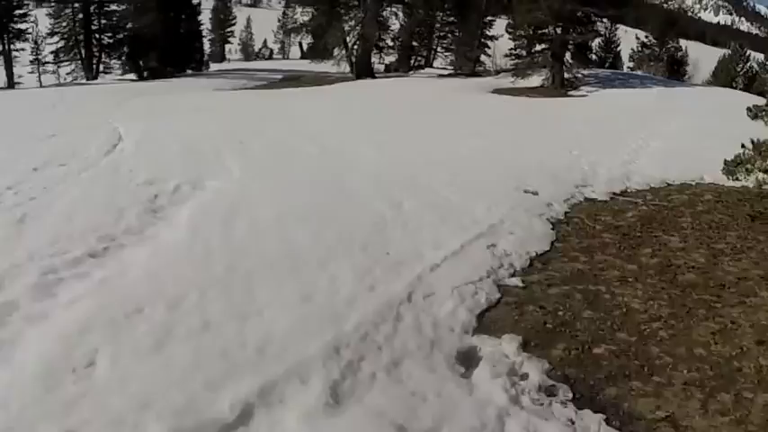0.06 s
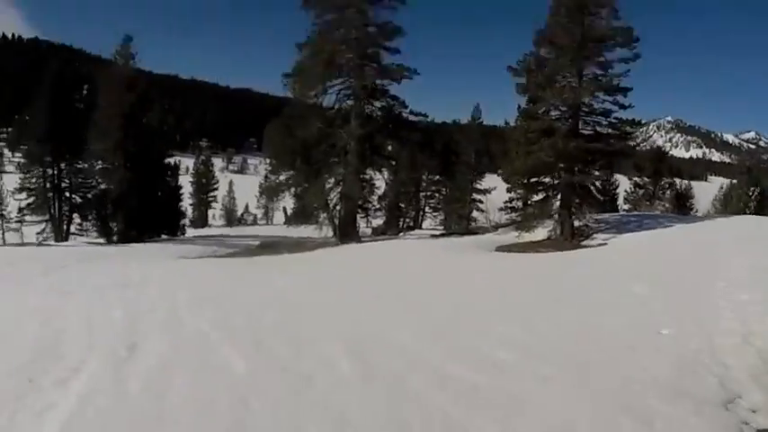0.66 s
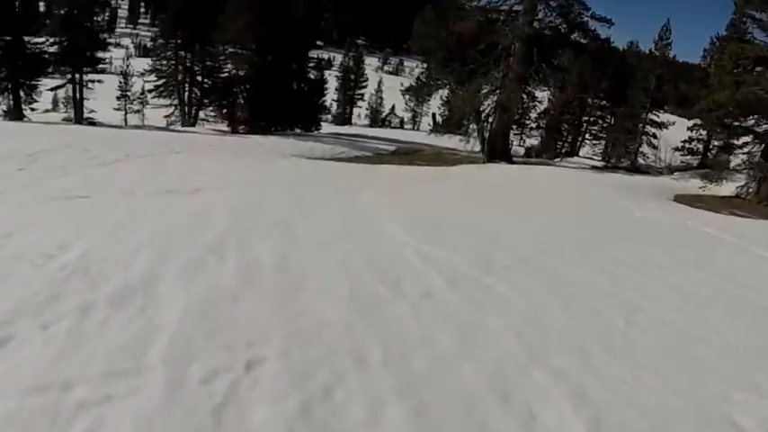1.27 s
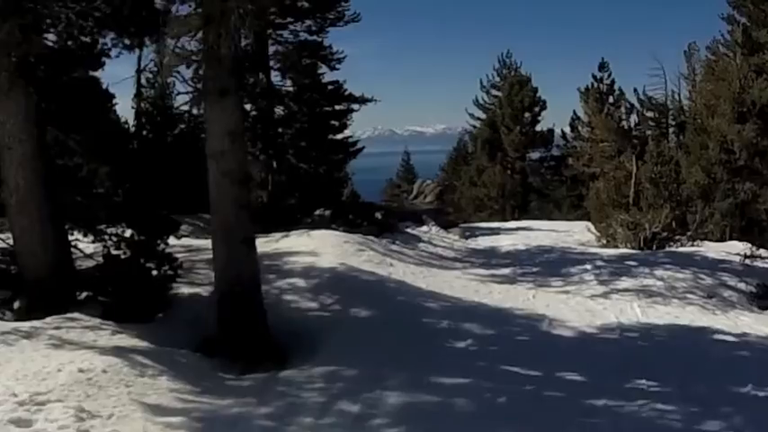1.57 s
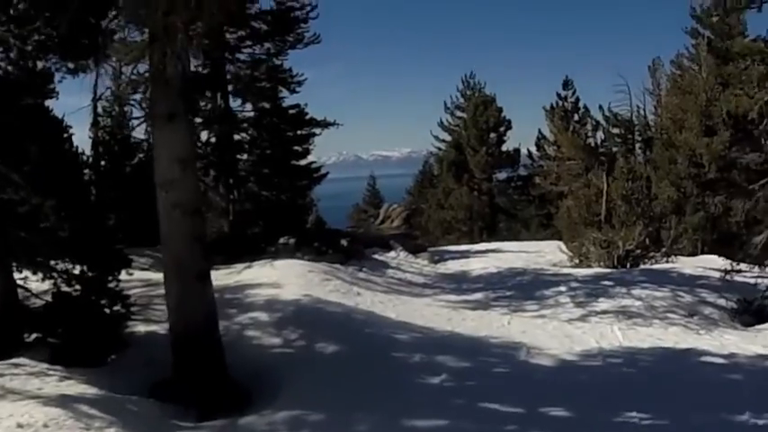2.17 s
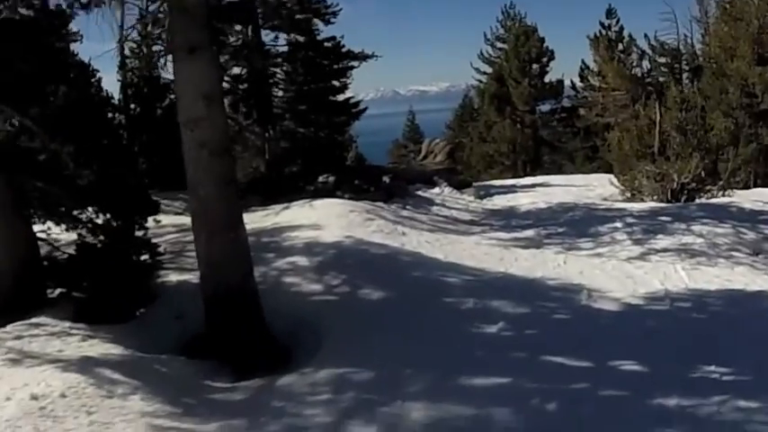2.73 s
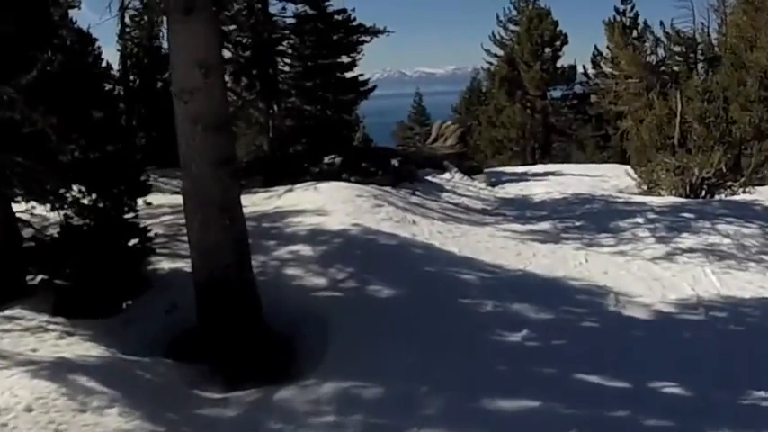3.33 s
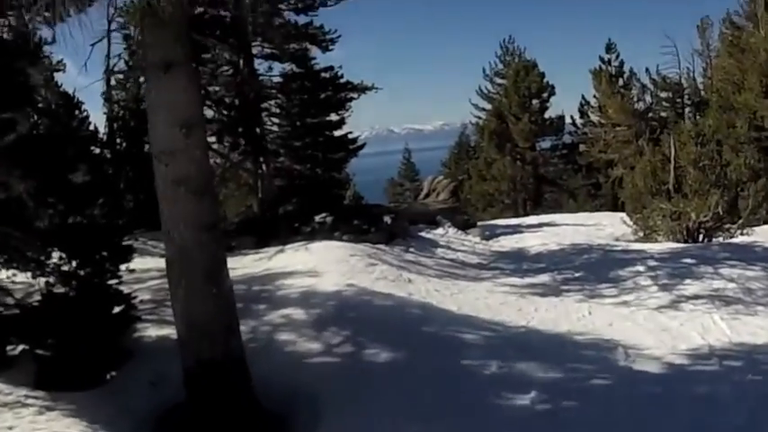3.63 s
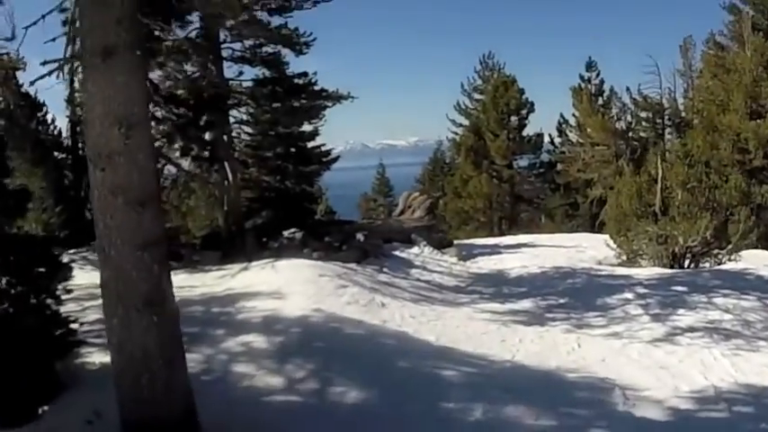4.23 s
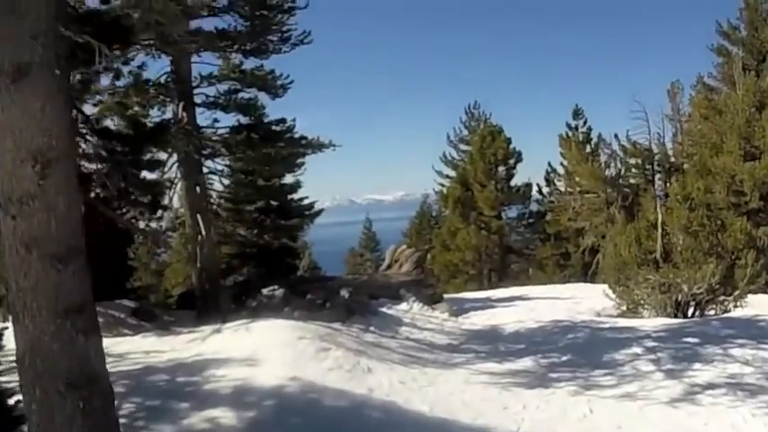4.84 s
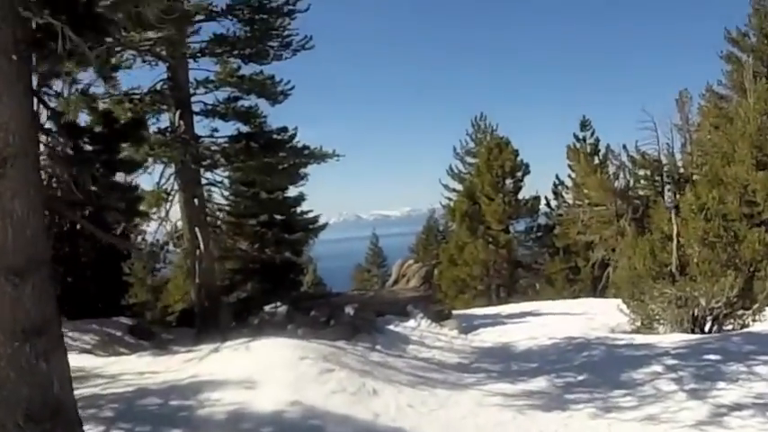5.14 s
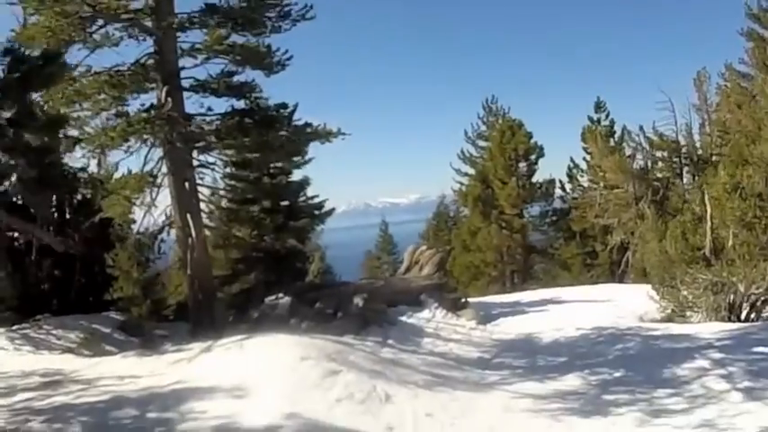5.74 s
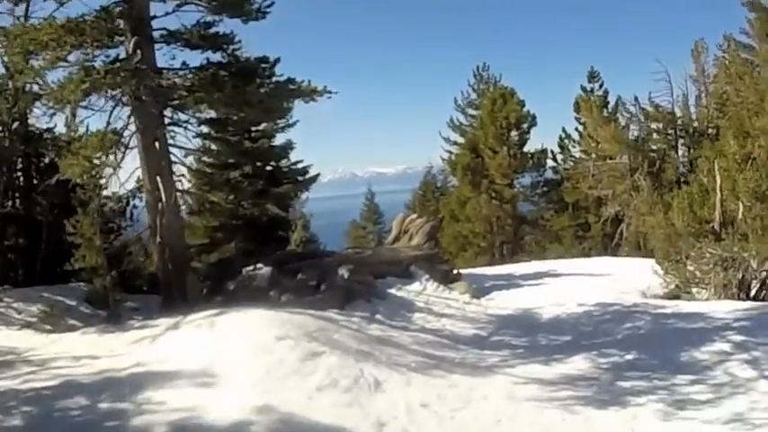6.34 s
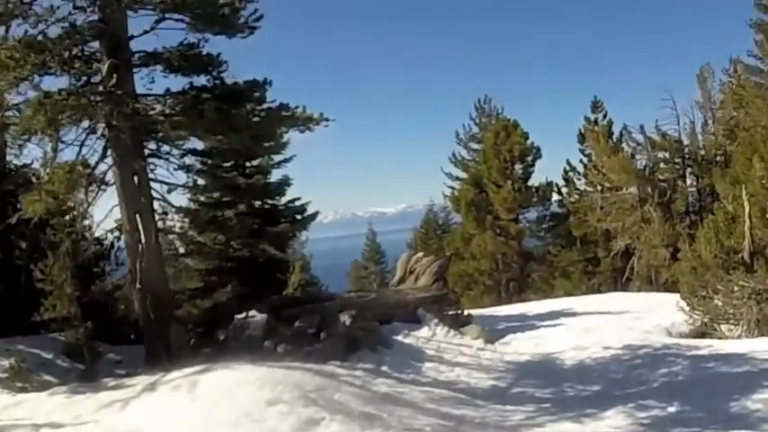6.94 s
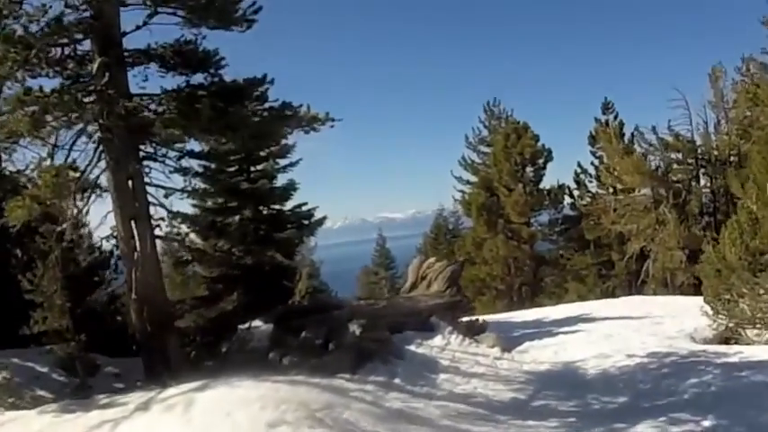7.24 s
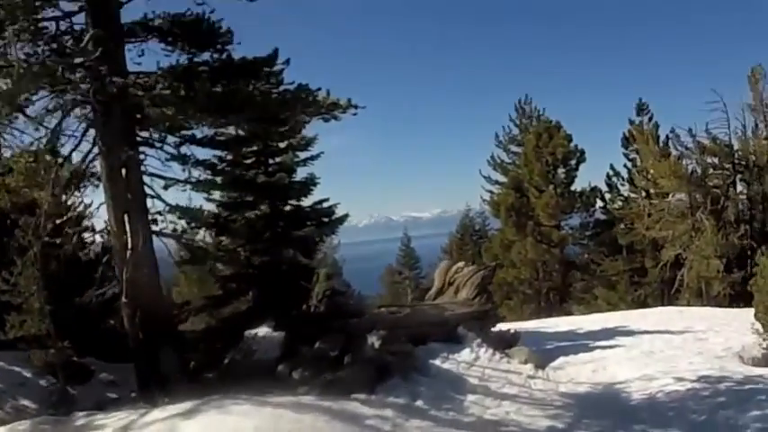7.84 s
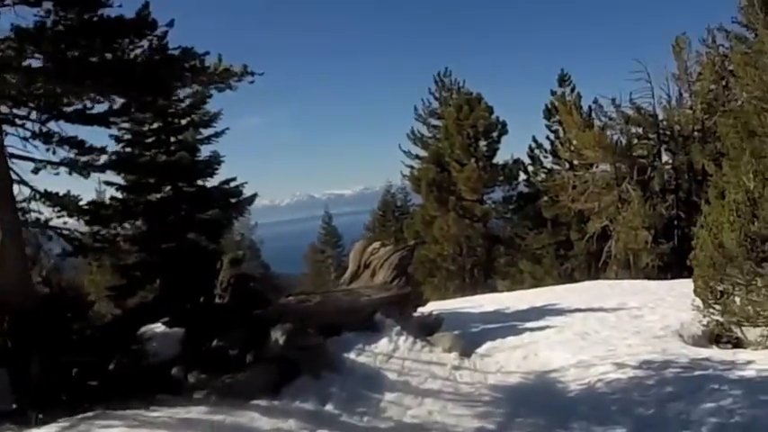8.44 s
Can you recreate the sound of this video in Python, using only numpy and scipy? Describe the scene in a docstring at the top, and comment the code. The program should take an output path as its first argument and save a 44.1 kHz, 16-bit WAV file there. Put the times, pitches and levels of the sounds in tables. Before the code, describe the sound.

Bike tyres crunch over firm snow while loose parts rattle and wind buffets the microphone, fast at first, then slower.

```python
"""On firm spring snow, a camera rides along with a bike: first fast, then, after a brief dip, slower.
The crust crunches under the tyres, grinds in skids and snaps in plates; ice grains hiss and tinkle.
Loose parts tick over the bumps, the frame clacks and something squeaks once.
Wind eddies buffet the microphone. The camera's case makes everything boxy."""
import sys
import numpy as np
from scipy import signal
from scipy.fft import rfft, irfft, next_fast_len
from scipy.io import wavfile
from scipy.ndimage import uniform_filter1d, map_coordinates

SR = 44100
rng = np.random.default_rng(int(sys.argv[2]) if len(sys.argv) > 2 else 0)


def file_out(sig):
    """Save sig as 16-bit WAV at sys.argv[1]."""
    # one column per channel
    cols = np.atleast_2d(sig).T
    # limit, then scale
    lim = np.clip(cols, -1, 1)
    pcm = np.round(lim * 32767).astype(np.int16)
    wavfile.write(sys.argv[1], SR, pcm)


N = 374850
TIME = np.arange(N) / SR

# Steady rolling: (time [s], crunch [dB], hiss [dB])
ROLLING_LEVELS = [(0, -24.5, -44.5), (.5, -25.5, -48.5), (1.45, -24.5, -48), (1.57, -30.5, -51.5),
                  (1.7, -43.5, -61.5), (2.1, -38.5, -59.5), (3.35, -38, -58.5), (4.15, -36, -55),
                  (4.45, -31.5, -54.5), (5.7, -30, -52.5), (6.3, -34.5, -57), (6.75, -31.5, -54),
                  (7.35, -34, -58), (7.75, -33, -54.5), (8.5, -32.5, -56)]
# Bumps (+) and hollows (-): (time [s], half length [s], crunch [dB], hiss [dB])
BUMP_LOADS = [(.15, 0.03, 6, 0.5), (.225, .02, -2, 1), (.266, 0.023, 6.5, -1), (2.43, .05, -7.5, -2.5),
              (2.58, .07, 2.5, 1), (2.795, 0.067, 6, 6), (2.97, .04, 0.5, -2), (3.15, 0.035, 10, 4),
              (3.59, 0.13, 4, 2), (3.715, 0.04, 6.5, 5), (3.95, .035, 2.5, 2), (4.15, 0.027, 0, 2),
              (4.33, .04, 4, 1), (4.57, .03, 1.5, 1), (4.65, .025, 1.5, 5), (4.765, 0.07, -12, -5.5),
              (4.855, .025, 0, -2.5), (4.93, .05, 2, 2.5), (5.15, .09, -6.5, -1.5), (5.38, 0.06, -7.5, -2),
              (5.47, 0.026, 5, -2), (5.6, .03, 2, 2), (5.7, 0.044, -2, 0), (5.93, .03, 5.5, 1.5),
              (6.5, .03, -2.5, -1.5), (6.58, .03, 1.5, 1.5), (7.25, 0.031, 2.5, 0), (7.42, .06, -5, -2.5),
              (7.63, .04, 2, 0), (7.74, 0.035, 4, 0.5), (7.85, 0.049, 2.5, 0), (7.96, .04, -3, 1.5),
              (8.28, .02, 2.5, -1), (8.42, 0.064, 1.5, 0)]
def contact_db():
    """Crunch and hiss levels of the tyres: steady rolling plus the load over each bump."""
    return np.array(curves(ROLLING_LEVELS)) + swells(BUMP_LOADS)


# Breaking crust: (frequency [Hz], gain [dB])
CRUNCH_SPECTRUM = [(40, -33), (160, -9.5), (300, -4.5), (500, 0), (750, 1), (1130, 2), (1300, -6.5),
                   (1600, -15.5), (2050, -22.5), (2550, -35.5), (3100, -27), (4500, -64), (8500, -55),
                   (11000, -74)]
# Ice grains: (frequency [Hz], gain [dB])
HISS_SPECTRUM = [(800, -5.5), (2000, 11.5), (2600, 4.5), (3100, 5), (4000, 0.5), (4700, -4), (5900, -0.5),
                 (7000, -6), (8400, -12), (9400, -19.5), (10300, -18), (11200, -23), (12400, -19.5),
                 (14200, -34), (15400, -47)]
def tyres(clump_db=0.92, tilt_db=3, mush_db=-5, grit_db=-2, crust_db=2, ice_db=3.5, ripple_db=1.5):
    """The crust breaks in clumps under the tread: dull cracks and a fine hiss of ice grains."""
    crunch_db, hiss_db = contact_db() + ripple_db * wobble(rate_hz=14)  # ripples in the snow
    clumps_db = clump_db * wobble(rate_hz=60)
    pace = amp(.6 * (crunch_db - np.mean(crunch_db)))  # faster riding breaks more crust
    crunch = np.zeros(N)
    for slope_db in (-tilt_db, tilt_db):  # a duller and a brighter layer of cracks
        cracks = grains(per_s=450 * pace, spread_db=2) / np.sqrt(pace)
        crust = unit(cracks) + amp(mush_db) * rng.standard_normal(N)
        spectrum = [(hz, db + slope_db * np.clip(np.log2(hz / 750), -1, 1))
                    for hz, db in CRUNCH_SPECTRUM]
        crunch += coloured(crust * amp(clumps_db), spectrum)
    ice = rng.standard_normal(N) + amp(grit_db) * crackle(per_s=130 * pace, decay_s=0.0017)
    hiss = unit(coloured(ice * amp(1.54 * clumps_db), HISS_SPECTRUM))
    return amp(crunch_db + crust_db) * levelled(crunch, samples=5000) + amp(hiss_db + ice_db) * hiss


def grains(per_s, spread_db):
    """Tiny fractures of uneven size at random moments; rms 1."""
    fractures = rng.random(N) < per_s / SR
    sign = rng.choice([-1, 1], N)
    size_db = spread_db * np.clip(rng.standard_normal(N), -2, 2)
    return unit(fractures * sign * amp(size_db))


def crackle(per_s, decay_s):
    """Ice grains scatter in tiny sprays that start at once and die away."""
    t = np.arange(SR // 25) / SR
    power = signal.fftconvolve(grains(per_s, spread_db=-1.5) ** 2, np.exp(-t / decay_s))[:N]
    return unit(np.sqrt(np.abs(power)) * rng.standard_normal(N))


# Tread slips: (time [s], length [s], level [dB])
SKID_EVENTS = [(0.853, 0.32, -40), (1.724, 0.33, -54.5), (2.218, 0.07, -47), (2.52, 0.15, -47.5),
               (2.74, 0.02, -47), (2.807, 0.012, -32.5), (3.115, 0.068, -40), (3.192, 0.13, -46),
               (3.438, 0.18, -46), (3.66, .03, -42), (3.692, 0.056, -35.5), (3.85, 0.14, -51),
               (4.128, 0.04, -41), (4.312, 0.041, -46), (4.56, 0.05, -42), (4.833, 0.015, -37.5),
               (4.897, 0.043, -43), (5.448, .04, -56), (6.557, 0.04, -41), (6.886, 0.035, -39.5),
               (7.03, 0.13, -49), (7.25, 0.029, -41), (7.59, 0.034, -46), (7.72, 0.34, -52)]
# Grinding crust: (frequency [Hz], gain [dB])
SKID_SPECTRUM = [(400, -12), (800, 5), (1150, 6), (1500, 2), (1950, 6.5), (2550, -12), (2950, 0.5),
                 (3300, -13.5), (3550, -7), (4500, -18), (8000, -22.5), (9500, -38), (13000, -40),
                 (15500, -37)]
def skids(attack_s=0.0057, mush_db=-9):
    """The tread bites into icy crust and eases off: a gritty run of tiny fractures."""
    power = np.zeros(N)
    for time_s, length_s, db in SKID_EVENTS:
        age_s = np.maximum(TIME - time_s, 0)
        bite = 1 - np.exp(-age_s / attack_s)
        release = np.exp(-.5 * (age_s / length_s) ** 2)
        power += (amp(db) * bite * release) ** 2
    grit = grains(per_s=450, spread_db=3) + amp(mush_db) * rng.standard_normal(N)
    return np.sqrt(power) * levelled(coloured(grit, SKID_SPECTRUM), samples=2000)


# Crust plates giving way: (time [s], level [dB])
PLATE_SNAPS = [(0.275, -5), (0.29, -16), (4.989, -14), (5.189, -14), (5.27, -20), (6.396, -15.5),
               (6.525, -17.5), (7.045, -11), (7.107, -20), (7.318, -23), (8.189, -21), (8.284, -11)]
def plates(gain_db=-2):
    """A larger piece of crust snaps: one impulse, as boxy as the crunch."""
    snap = coloured(signal.unit_impulse(SR // 20), CRUNCH_SPECTRUM)
    snap /= np.abs(snap).max()
    out = np.zeros(N + SR)
    for time_s, db in PLATE_SNAPS:
        out[round(time_s * SR):][:len(snap)] += amp(db + gain_db) * snap
    return out[:N]


# Loud rattles: (time [s], click [dB], knock [dB], length [s], ring [Hz], ring [dB])
LOUD_TAPS = [(.1005, -30, -19.5, 0.0015, 8700, 9), (.1465, -32, -27.5, 0.0026, 2570, 7.5),
             (.157, -31, -33, 0.0038, 7250, 7), (.2595, -33, -26, 0.0032, 7900, 6),
             (.343, -27.5, -25, 0.00078, 6700, 9), (.419, -37, -34, 0.002, 3100, 6),
             (.454, -30, -32, 0.0032, 7700, -12), (.549, -37, -31, 0.0046, 8100, -1),
             (.5905, -30, -26, 0.0021, 7740, 1), (.597, -34, -26, 0.002, 2220, 11),
             (.6025, -36, -28, 0.0052, 4600, 4), (.637, -39, -30, 0.0053, 8270, 4),
             (.6753, -34.5, -50, 0.003, 2920, 13), (.734, -29.5, -25.5, 0.0036, 4800, 1),
             (.7415, -29, -29, 0.0018, 4800, 5), (.868, -39, -43, 0.0099, 8100, 0),
             (1.102, -30, -25.5, 0.0011, 4540, 4), (1.383, -35, -44, 0.0031, 2500, 5.5),
             (2.1482, -51.5, -46, 0.0012, 5050, 21), (2.8225, -42, -44, 0.0036, 7800, 6),
             (2.873, -45, -35, 0.0021, 3900, -2), (3.037, -53, -39, .0012, 3600, 4),
             (3.082, -45, -33, 0.0027, 3360, 6), (3.707, -47, -34, 0.0044, 2950, 17),
             (3.731, -42, -32.5, 0.0048, 3030, 14), (4.233, -60, -43, 0.0026, 2940, 22),
             (4.5895, -45, -34, 0.0027, 3430, 14), (4.1345, -46, -34, 0.005, 3100, 13),
             (4.157, -53, -36.5, .002, 3300, 10), (4.4965, -51, -34, 0.002, 1690, 2),
             (4.6522, -23, -29, 0.00087, 3430, 10.5), (4.654, -45, -22.5, 0.0012, 8200, 5),
             (4.7826, -47, -31.5, 0.0033, 1950, 3), (4.901, -38.5, -35, 0.0018, 8040, 8),
             (5.039, -35.5, -36, 0.0028, 2260, 18.5), (5.133, -41.5, -34, 0.0035, 4570, -3),
             (5.1925, -41, -31, 0.0021, 7840, 7), (5.32, -46, -37, 0.0021, 2270, 14),
             (5.563, -42, -36, .0012, 6000, 4), (5.6, -41.5, -35, 0.0021, 1570, 1),
             (5.674, -44, -44, .002, 4900, 15), (5.685, -44, -39, 0.0035, 2300, 8),
             (5.734, -43, -40, 0.0023, 5500, 2), (5.746, -42, -35, 0.0018, 4700, 7),
             (5.753, -41, -40, 0.002, 7800, 8), (5.788, -38, -31, 0.0011, 4660, 1),
             (5.811, -45, -31, 0.0027, 6000, -7), (5.972, -50, -37, .0015, 4800, -1),
             (5.988, -42.5, -29, 0.0037, 3900, 3), (6.0483, -35.5, -30, 0.002, 3770, 3),
             (6.193, -44, -32, 0.0034, 7900, 9), (6.27, -45, -41, .002, 7500, 1),
             (6.315, -47, -36.5, 0.0025, 6850, 5), (6.408, -57, -36.5, 0.00085, 3740, 20),
             (6.685, -42, -31, 0.0028, 3830, 12), (6.778, -53, -37, 0.0022, 2900, 11),
             (6.8835, -36.5, -31, 0.0026, 2900, 4), (6.9457, -44, -51, 0.0029, 8700, 8),
             (6.9905, -37.5, -34, 0.0016, 7200, -2), (7.845, -47.5, -31, .0015, 3300, 3),
             (8.4156, -43.5, -40, 0.0024, 5130, 17.5)]
# Bright click: (frequency [Hz], gain [dB])
CLICK_SPECTRUM = [(1500, -7), (2800, -10.5), (3600, 4), (4400, -2), (5100, 1.5), (6000, 5.5), (7200, -2.5),
                  (8300, -0.5), (9500, -16.5), (12000, -17), (15500, -39)]
# Hollow knock: (frequency [Hz], gain [dB])
KNOCK_SPECTRUM = [(200, 2.5), (700, 6), (1150, 11), (1500, -5.5), (2100, -5), (2800, -14), (5000, -21.5),
                  (9000, -66)]
def rattles(click_gain_db=-1, knock_gain_db=7.5, bounce_db=-16, ring_width_hz=220):
    """Loose parts graze, tap and bounce: a click, a knock and the part's own short ring."""
    out = np.zeros(N + 2 * SR)
    t = np.arange(-(SR // 20), SR // 20) / SR
    for time_s, click_db, knock_db, length_s, ring_hz, ring_db in [*LOUD_TAPS, *chatter()]:
        graze = .07 * np.exp(-np.abs(t + rng.uniform(0, .007)) / .005)
        bounce = amp(bounce_db) * blow(t - rng.uniform(0.0055, 0.0118), length_s)
        envelope = graze + blow(t, length_s) + bounce
        hardness = np.clip(0.0018 / length_s, .5, 2)  # shorter contact is brighter
        spectrum = [(hz, db + 4 * (hardness - 1) * np.log2(hz / 5000)) for hz, db in CLICK_SPECTRUM]
        tap = amp(click_db + click_gain_db) * burst(envelope, length_s, spectrum)
        tap += amp(knock_db + knock_gain_db) * burst(envelope, length_s, KNOCK_SPECTRUM)
        resonator = signal.iirpeak(ring_hz, ring_hz / ring_width_hz, SR)
        tap += amp(ring_db) * signal.lfilter(*resonator, tap)
        out[SR + round((time_s + t[0]) * SR):][:len(t)] += tap
    return out[SR:SR + N]


def chatter(per_s=11, spread_db=6, click_db=-1.5, knock_db=9.5, ring_db=-1, low_hz=1790, high_hz=8050):
    """Faint random rattles, as rows like LOUD_TAPS: more and louder where the ride is rough."""
    _, hiss_db = contact_db()
    summed_roughness = np.cumsum(amp(.5 * hiss_db))
    rows = []
    for when, size, duration, pitch in rng.random((int(per_s * N / SR), 4)):
        onset = np.searchsorted(summed_roughness, when * summed_roughness[-1])
        db = hiss_db[onset] + spread_db * (2 * size - 1)
        length_s = 0.002 * (.5 + duration)
        ring_hz = low_hz * (high_hz / low_hz) ** pitch
        rows.append((onset / SR, db + click_db, db + knock_db, length_s, ring_hz, ring_db))
    return rows


# Hard contacts: (time [s], peak [dB], pitch [Hz], t60 [s])
FRAME_HITS = [(0.3434, -19.5, 2200, 0.016), (.4535, -19, 1210, .018), (0.595, -15, 1165, .014),
              (4.1317, -23.5, 1430, .02), (4.4974, -20.5, 1300, 0.015), (4.6521, -20, 3480, .014),
              (4.7818, -18, 1380, 0.01), (4.903, -15, 1100, .018), (5.039, -22, 1270, 0.01),
              (5.149, -25, 1370, 0.028), (5.752, -13.5, 1113, .015), (5.987, -14, 1310, .01),
              (6.051, -22.5, 1000, .016)]
# Frame modes: (ratio to pitch [-], level [dB])
FRAME_MODES = [(1, 3), (1.42, -12.5), (2.9, -23)]
def clacks(attack_s=0.00053):
    """Each hard contact rings a few heavily damped modes of the frame."""
    out = np.zeros(N + SR)
    t = np.arange(SR // 20) / SR
    attack = 1 - np.exp(-(t / attack_s) ** 2)
    for time_s, db, hz, t60_s in FRAME_HITS:
        ring = sum(amp(mode_db) * np.sin(2 * np.pi * hz * ratio * t) for ratio, mode_db in FRAME_MODES)
        ring *= attack * amp(-60 * t / t60_s)
        out[round(time_s * SR):][:len(t)] += amp(db) * ring / np.abs(ring).max()
    return out[:N]


# Airflow at the microphone: (time [s], level [dB])
AIRFLOW_LEVELS = [(0, -22.5), (.15, -16), (.58, -16), (1.15, -21.5), (1.57, -21.5), (1.7, -42),
                  (2.15, -33.5), (3.3, -36.5), (3.55, -29), (4.42, -35), (4.65, -30), (5.8, -28.5),
                  (6.05, -38), (6.8, -36.5), (7.22, -28.5), (7.65, -42.5), (8.3, -52), (8.5, -41)]
# Gusts (+) and lulls (-): (time [s], half length [s], large eddies [dB], small eddies [dB])
GUST_SWELLS = [(.33, 0.063, -3.5, 4), (.64, 0.047, -0.5, 3.5), (.78, 0.041, -1, -8.5), (.94, 0.072, 2, 2.5),
               (1.5, 0.019, 6, 4), (2.17, 0.059, -1, 2.5), (3.15, 0.21, 5, 10.5), (3.56, 0.086, -10, -6.5),
               (3.81, 0.05, 7.5, 1), (4.15, 0.043, -6, -8), (4.29, .05, -2, -5), (4.4, 0.055, 4, 3.5),
               (4.635, 0.049, 11.5, -9), (4.82, 0.051, 6, 0), (4.93, 0.027, 8.5, 10), (5.375, 0.061, 12, 0),
               (5.52, 0.036, 5.5, 1), (6.05, .12, -2, -2.5), (6.29, 0.023, 11.5, -1), (6.48, 0.028, 9.5, 4),
               (6.7, 0.038, 5.5, 4), (6.93, .03, 6, -5), (7.1, 0.044, 5, -3), (7.26, 0.045, 6, 2.5)]
# Large eddies: (frequency [Hz], gain [dB])
BUFFET_SPECTRUM = [(12, -17), (25, -5), (45, -1), (70, -3), (90, -6), (130, -17.5), (300, -61),
                   (1000, -100)]
# Small eddies: (frequency [Hz], gain [dB])
FLUTTER_SPECTRUM = [(30, -53), (75, 0.5), (110, 0.5), (160, -1.5), (220, -7.5), (290, -10), (400, -14.5),
                    (800, -31), (2000, -62), (5000, -110)]
def wind(large_db=-0.93, small_db=-3.5, breeze_db=-32, flutter_growth=1.196, sway_db=2, lump_db=2):
    """Large eddies thump on the microphone; small ones, strongest at speed, flutter above them."""
    air_db, = curves(AIRFLOW_LEVELS)
    large_gust_db, small_gust_db = swells(GUST_SWELLS)
    buffet_db = air_db + large_db + large_gust_db + sway_db * wobble(rate_hz=11)
    flutter_db = breeze_db + flutter_growth * (air_db - breeze_db) + small_db + small_gust_db
    lumps = amp(lump_db * wobble(rate_hz=36))
    buffet = levelled(coloured(rng.standard_normal(N) * lumps, BUFFET_SPECTRUM), samples=5000)
    flutter = levelled(coloured(rng.standard_normal(N) * lumps, FLUTTER_SPECTRUM), samples=4000)
    return amp(buffet_db) * buffet + amp(flutter_db) * flutter


def squeak(time_s=5.715, half_s=.016, pitch_hz=1245, glide=0.017, gain_db=-27):
    """Something rubs for a moment at a slightly rising pitch."""
    progress = (TIME - time_s) / half_s
    hz = pitch_hz * (1 + glide * np.tanh(progress))
    phase = 2 * np.pi * np.cumsum(hz) / SR
    return amp(gain_db) * np.exp(-progress ** 2) * unit(np.sin(phase))


# Showers of ice: (time [s], half length [s], boost [dB])
CRUMB_SHOWERS = [(3.83, .06, 3), (4.33, .08, 4), (5.71, .06, 7), (6, .04, 11)]
def crumbs(per_s=75, low_hz=4020, high_hz=8570, t60_s=0.0096, gain_db=-2, spread_db=4):
    """Bits of ice ping, each at its own pitch, louder where the tyres dig in."""
    _, hiss_db = contact_db()
    shower_db, = swells(CRUMB_SHOWERS)
    level_db = hiss_db + shower_db + gain_db
    when, pitch, size = rng.random((int(per_s * N / SR), 3)).T
    onsets = (when * N).astype(int)
    t = np.arange(SR // 50) / SR
    hz = low_hz * (high_hz / low_hz) ** pitch
    peaks = amp(level_db[onsets] - spread_db * np.log(size + 0.056))
    pings = peaks[:, None] * np.sin(2 * np.pi * hz[:, None] * t) * amp(-60 * t / t60_s)
    positions = onsets[:, None] + np.arange(len(t))
    return np.bincount(positions.ravel(), pings.ravel(), N)[:N]


# Thrown snow: (frequency [Hz], gain [dB])
SPRAY_SPECTRUM = [(4000, -37), (5400, -17), (5950, 10), (6700, 0), (7600, -6), (10000, -39)]
def spray(time_s=1.11, half_s=0.29, gain_db=-52):
    """At speed the tyres throw up fine snow that sizzles in a narrow band."""
    envelope = np.exp(-((TIME - time_s) / half_s) ** 2)
    return amp(gain_db) * envelope * unit(coloured(rng.standard_normal(N), SPRAY_SPECTRUM))


def amp(db):
    """Decibels to gain."""
    return 10 ** (np.asarray(db) / 20)


def unit(x):
    """x at rms 1."""
    return x / np.sqrt(np.mean(x ** 2) + 1e-20)


def levelled(x, samples):
    """x with its running rms held at 1, leaving the fast texture."""
    return x / np.sqrt(np.abs(uniform_filter1d(x ** 2, size=samples)) + 1e-12)


def curves(rows):
    """One interpolated track per column after the time."""
    times_s, *columns = np.transpose(rows)
    return [np.interp(TIME, times_s, column) for column in columns]


def swells(rows, skew=1.25):
    """Bells in dB that come faster than they go; one track per level column."""
    bell = lambda u: np.exp(-(u * np.where(u < 0, skew, 1 / skew)) ** 2)
    return sum(np.outer(dbs, bell((TIME - time_s) / half_s)) for time_s, half_s, *dbs in rows)


def wobble(rate_hz):
    """Smooth curve through random knots."""
    knots = rng.standard_normal(int(N * rate_hz / SR) + 4)
    steps = np.arange(0, len(knots) - 1, .125)
    return np.interp(TIME * rate_hz, steps, map_coordinates(knots, [steps]))


def coloured(x, spectrum):
    """x through a minimum-phase filter of (frequency [Hz], gain [dB]) points."""
    size = next_fast_len(len(x) + 2048, real=True)
    hz, db = np.transpose(spectrum)
    gain_db = np.interp(np.log(np.fft.rfftfreq(size, 1 / SR) + 1), np.log(hz), db)
    cepstrum = irfft(gain_db * np.log(10) / 20, size)
    cepstrum[1:size // 2] *= 2
    cepstrum[size // 2 + 1:] = 0
    return irfft(rfft(x, size) * np.exp(rfft(cepstrum)), size)[:len(x)]


def blow(t, length_s, rise_s=.0006):
    """Contact envelope: exponential rise to t = 0, then exponential decay."""
    return np.exp(np.minimum(t / rise_s, -t / (1.05 * length_s)))


def burst(envelope, length_s, spectrum):
    """Coloured noise under an envelope, with the energy of rms 1 held for length_s."""
    sound = coloured(envelope * rng.standard_normal(len(envelope)), spectrum)
    return sound * np.sqrt(length_s * SR) / np.linalg.norm(sound)


# Dip between the fast and slow stretches: (time [s], level [dB])
LEVEL_DIP = [(1.56, 0), (1.595, -3), (1.613, -10), (1.621, -29), (1.65, -16), (1.7, 0)]
def scene():
    """Snow, bike and wind, all close to one microphone; the level dips briefly."""
    dip_db, = curves(LEVEL_DIP)
    snow = tyres() + skids() + spray() + plates() + crumbs()
    bike = rattles() + clacks() + squeak()
    return ((snow + bike + wind()) * amp(dip_db))[None]


def record(dry, ceiling=.8, top_hz=15400):
    """The camera rounds off the highest peaks and keeps nothing above its band limit."""
    rounded = dry / (1 + np.abs(dry / ceiling) ** 6) ** (1 / 6)
    size = next_fast_len(N + SR // 2)
    passband = np.fft.rfftfreq(size, 1 / SR) < top_hz
    return irfft(rfft(rounded, size) * passband, size)[:, :N]


dry = scene()
out = record(dry)
file_out(out)
```